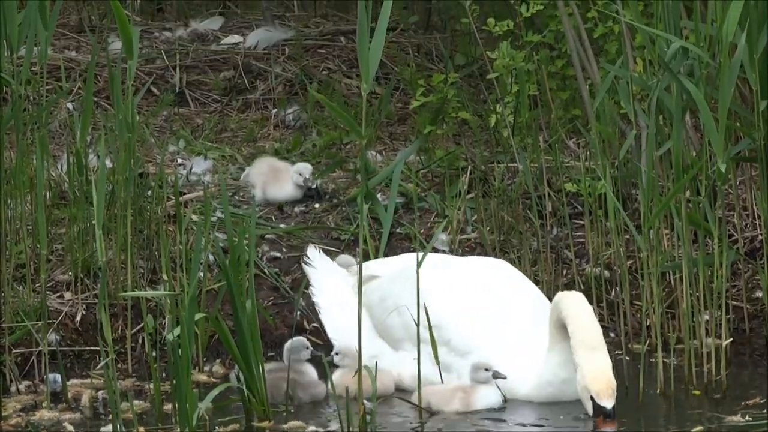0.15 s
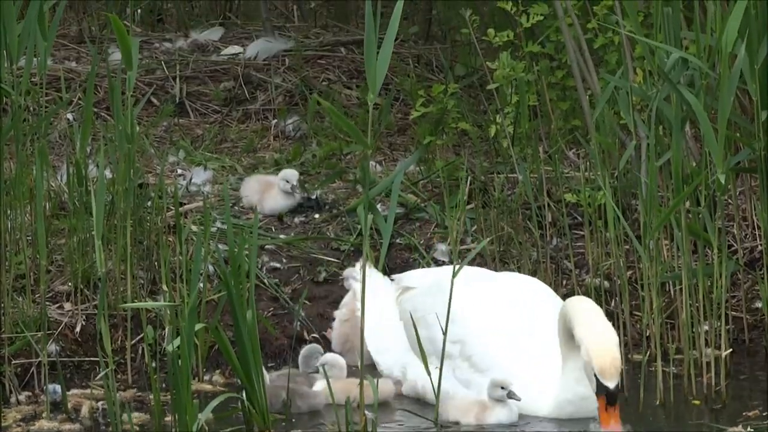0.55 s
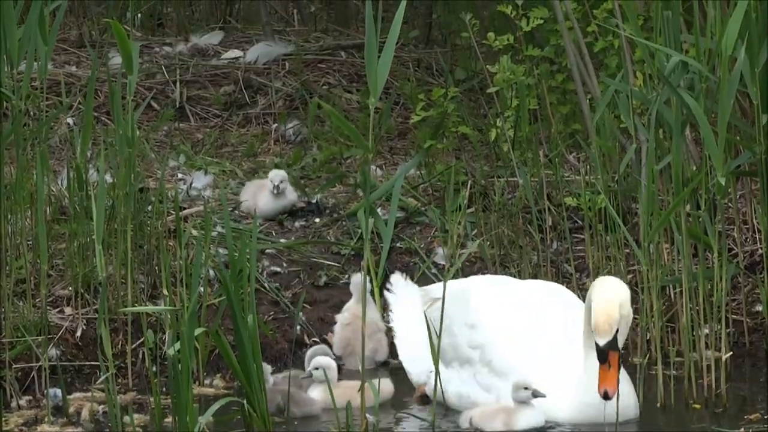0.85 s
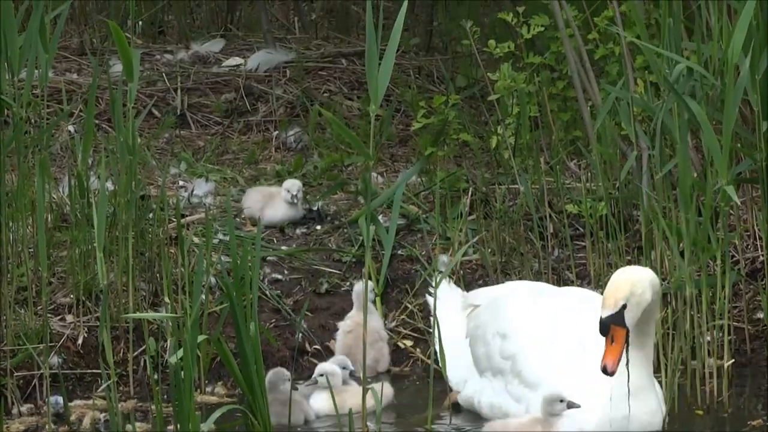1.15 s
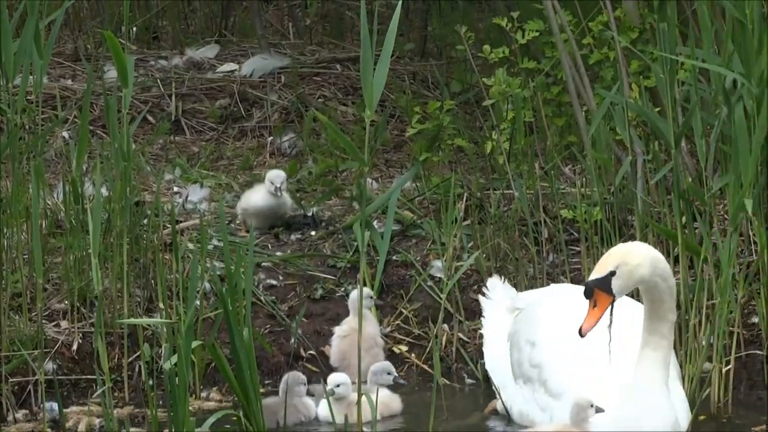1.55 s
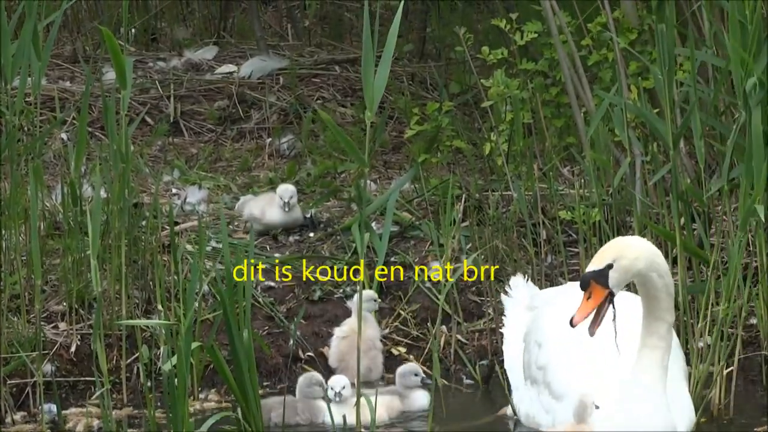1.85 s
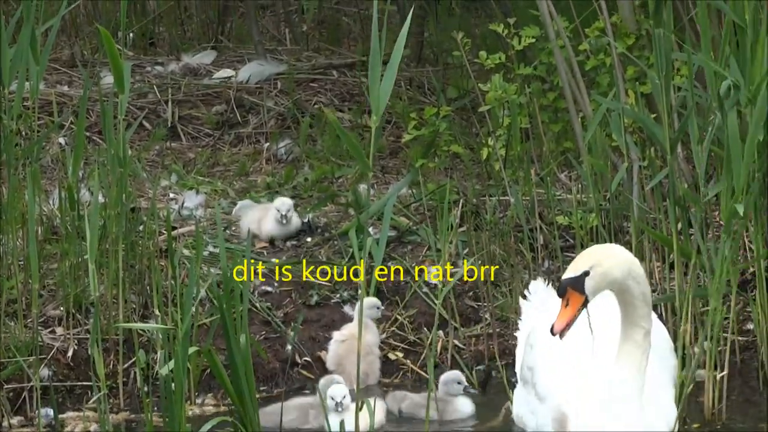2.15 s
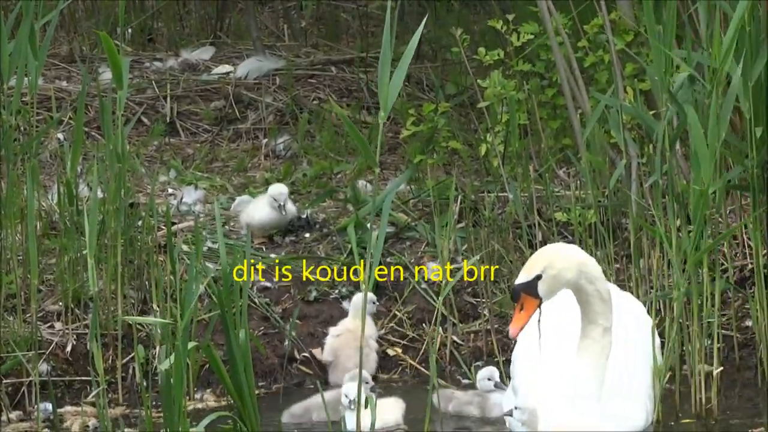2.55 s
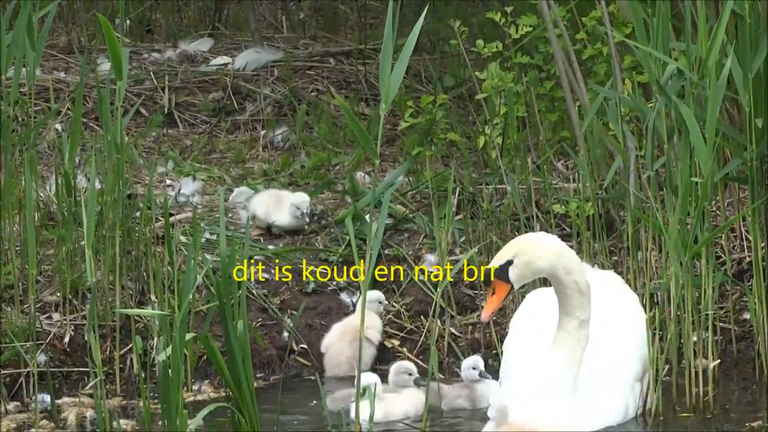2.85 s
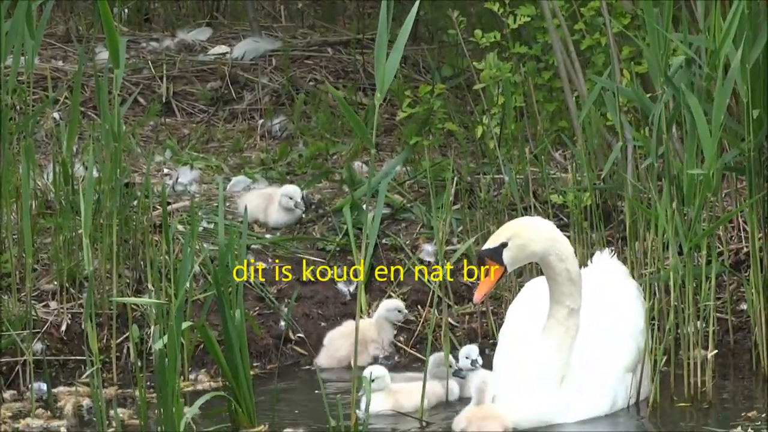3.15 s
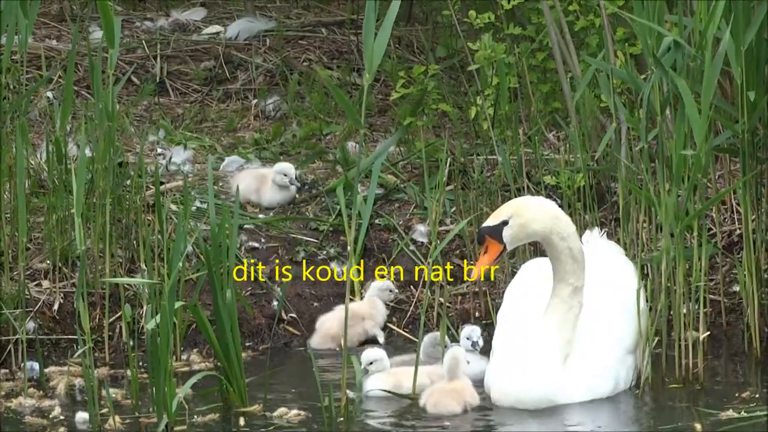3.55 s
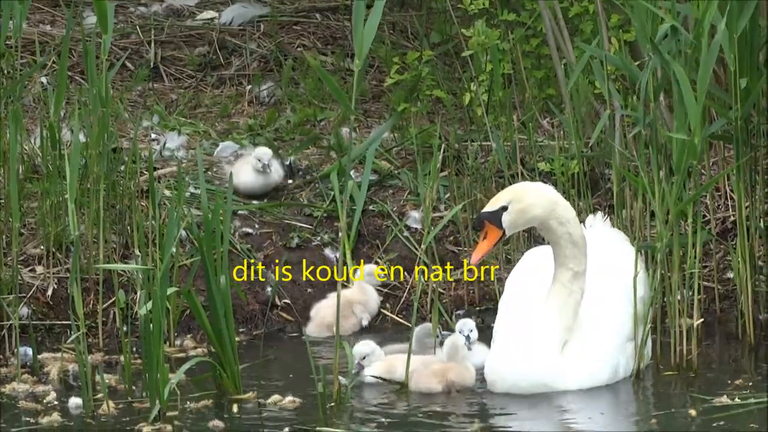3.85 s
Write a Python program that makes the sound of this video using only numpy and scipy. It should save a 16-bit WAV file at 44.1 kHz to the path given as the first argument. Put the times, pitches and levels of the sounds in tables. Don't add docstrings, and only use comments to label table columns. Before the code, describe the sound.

Swan snorting briefly three times beside a reedy bank, with thin chick peeps and gusty wind rumble.

```python
import sys
import numpy as np
from scipy import signal
from scipy.io import wavfile
from scipy.ndimage import uniform_filter1d

SR = 44100
rng = np.random.default_rng(int(sys.argv[2]) if len(sys.argv) > 2 else 0)


def put_to_file(sound):
    columns = np.atleast_2d(sound).T
    safe = np.clip(columns, -1, 1)
    whole_steps = np.round(safe * 32767)
    wavfile.write(sys.argv[1], SR, whole_steps.astype(np.int16))


def field_ratio(decibels):
    return 10 ** (np.asarray(decibels, dtype=float) / 20)


N = 175959


def read(points, hz):
    f, value = np.transpose(points)
    return np.interp(np.log(hz + 1), np.log(f + 1), value)


def evened(x):
    return x / np.sqrt(np.mean(x ** 2) + 1e-20)


def add(mix, s, sound):
    part = mix[..., max(round(s * SR), 0):][..., :sound.shape[-1]]
    part += sound[..., :part.shape[-1]]


def resonate(x, hz, *widths):
    turn = np.exp(2j * np.pi * hz * np.arange(x.shape[-1]) / SR)
    for width in widths:
        r = np.exp(-np.pi * width / SR)
        x = 2 * (turn * signal.lfilter([1 - r], [1, -r], x / turn)).real
    return x


def wander(size, span):
    drift = uniform_filter1d(rng.standard_normal(size), span)
    return evened(uniform_filter1d(drift, span))


def noise(colour, same, patchy_db, flicker_db):
    frames, hz = N // 256 + 5, np.fft.rfftfreq(1024, 1 / SR)
    a, b, c, d, patches = rng.standard_normal((frames, 513, 5)).T
    patches = uniform_filter1d(patches, size=10, axis=0)
    patches = evened(uniform_filter1d(patches, size=12, axis=1))
    like = np.clip(read(same, hz), 0, 1)[:, None]
    mid = np.sqrt(1 + like) * (a + 1j * b)
    side = np.sqrt(1 - like) * (c + 1j * d)
    z = np.array([mid + side, mid - side])
    z *= field_ratio(read(colour, hz)[:, None] + patchy_db * patches + flicker_db * wander(frames, 3))
    return evened(signal.istft(z, nperseg=1024, noverlap=768)[1][:, :N])


def scatter(dry, db):
    t60 = .17
    taps = rng.standard_normal((2, 6000)) * field_ratio(-60 * np.arange(6000) / SR / t60)
    return signal.fftconvolve(dry[None], taps * field_ratio(db) / np.linalg.norm(taps[0]), axes=1)[:, :N]


def snort(start, length, first_hz, top_hz, effort_db, bright_db, hiss_db, upper_db, rasp_db):
    # f/Hz, level/dB
    tract = [(640, -17.5), (800, 0), (1300, 0), (1550, -4), (1980, -4), (2350, -15), (2580, 0.5),
             (2720, -20),
             (3250, -17), (3800, -37), (4500, -19.5), (5500, -37), (7150, -20), (8300, -36), (10000, -45)]
    # f/Hz, width/Hz, level/dB
    nostril = [(7000, 480, 2), (8000, 1600, 9)]
    t = np.arange(0, length, 1 / SR)
    glide_share, jitter = .62, 0.0078
    climb = np.sin(np.pi / 2 * np.clip((t / length - .08) / glide_share, 0, 1)) ** 1.3
    hz = (first_hz + (top_hz - first_hz) * climb) * (1 + jitter * wander(len(t), 150))
    turns = np.cumsum(hz) / SR

    closed_db = -19
    shut_db = closed_db * (1 - climb) * (top_hz / first_hz - 1)
    voice = np.zeros(len(t))
    for k in range(1, 15):
        db = read(tract, k * hz)
        db = db + bright_db * np.clip(np.log2(k / 2), 0, 1) + upper_db * max(k - 3, 0)
        db = db + shut_db * np.clip(k - 2, 0, 2)
        db = db + 2.5 * wander(len(t), 120)
        voice += field_ratio(db) * np.cos(2 * np.pi * (k * turns + rng.random()))
    rattle = evened(resonate(rng.standard_normal(len(t)), 190, 260, 260))
    voice *= 1 + .15 * rattle
    rise_s, fall_s = .01, 0.021
    ramp = np.minimum(t / rise_s, (length - t) / fall_s)
    shape = np.sin(np.pi / 2 * np.clip(ramp, 0, 1)) ** 2

    hiss_linger_s = .035
    u = np.arange(0, length + hiss_linger_s, 1 / SR)
    air = rng.standard_normal(len(u))
    hiss = evened(sum(field_ratio(db) * resonate(air, f, w, 2 * w, 2 * w) for f, w, db in nostril))
    rasp = evened(resonate(rng.standard_normal(len(u)), 1700, 2000, 2000, 2000))
    out = (field_ratio(hiss_db) * hiss + field_ratio(rasp_db) * rasp) * np.sin(np.pi * (u / u[-1]) ** 0.87)
    swell_db = -1
    add(out, 0, np.sqrt(2) * voice * shape * field_ratio(effort_db + swell_db * (1.5 - climb)))
    return out


def swan():
    # t/s, length/s, first f/Hz, top f/Hz, effort level/dB
    calls = [
        (0.575, 0.034, 672, 675, -24.5),
        (0.595, 0.031, 676, 666, -33.5),
        (0.639, 0.028, 676, 665, -34.5),
        (0.834, .092, 382.8, 650, -25.5),
        (1.207, 0.094, 397, 601, -28),
    ]
    # slope above partial 2/(dB per octave), hiss level/dB,
    # slope above partial 3/(dB per partial), rasp level/dB
    timbres = [(-2, -52, -3, -48), (1, -53, -8, -43), (8, -53, -8, -44), (0, -41, 0, -41),
               (-8, -42, 1, -47)]
    dry = np.zeros(N)
    for call, timbre in zip(calls, timbres):
        add(dry, call[0], snort(*call, *timbre))
    t = np.arange(6000) / SR
    clap_hz, clap_db, clap_t60 = 2730, -15, 0.021
    clap = field_ratio(clap_db - 60 * t / clap_t60) * np.minimum(t / 0.0025, 1) * np.sin(2 * np.pi * clap_hz * t)
    add(dry, .922, clap)
    return dry * field_ratio([[.8], [-.8]]) + scatter(dry, -14)


def whistle(hz, level):
    turns = np.cumsum(hz) / SR
    overtone_db, overtone_hz, overtone_width = -7, 3220, 104
    overtone = field_ratio(overtone_db) / (1 + ((hz - overtone_hz) / overtone_width) ** 2)
    tone = np.sin(2 * np.pi * turns) + overtone * np.sin(4 * np.pi * turns)
    return np.sqrt(2) * tone * level * field_ratio(1.46 * wander(len(hz), 150))


def chicks():
    # t/s, f/Hz, level/dB
    peeps = [
        [(.23, 2105, -50), (.275, 2364, -44), (.3, 2833, -40), (.345, 3180, -39), (.372, 3240, -37),
         (.4, 3025, -35), (.42, 2300, -47)],
        [(.995, 2184, -49), (1.034, 2620, -43.5), (1.055, 2620, -46), (1.072, 2470, -43), (1.1, 2030, -56)],
    ]
    # t/s, length/s, first f/Hz, last f/Hz, level/dB
    chirps = [(.435, .035, 5000, 5050, -53), (2.222, .02, 4750, 4750, -52), (2.87, .03, 3700, 3950, -54),
              (.66, .036, 2030, 2020, -45), (1.01, .035, 1680, 1740, -47), (2.142, .018, 4350, 4300, -55),
              (3.565, .05, 4550, 4250, -57), (3.928, .032, 6200, 5400, -54)]
    # t/s, level/dB
    drops = [(0.384, -42), (1.439, -43), (2.179, -50), (2.351, -46), (2.422, -54), (2.526, -42.5),
             (2.988, -49), (3.137, -46.5), (3.333, -51), (3.47, -54)]
    # t/s, first f/Hz, level/dB
    lifts = [(2.14, 2200, -54), (2.29, 2600, -55), (2.935, 2400, -54), (3.055, 2250, -57),
             (3.285, 2750, -56), (3.378, 2300, -54)]
    out = np.zeros(N)
    for peep in peeps:
        s, hz, db = np.transpose(peep)
        t = np.arange(s[0], s[-1], 1 / SR)
        pitch = uniform_filter1d(np.interp(t, s, hz), size=500)
        add(out, s[0], whistle(pitch, field_ratio(np.interp(t, s, db))))
    notes = chirps + [(s, 0.0183, 3200, 2250, db) for s, db in drops]
    notes += [(s, .045, hz, 1.17 * hz, db) for s, hz, db in lifts]
    for start, length, first_hz, last_hz, db in notes:
        u = np.arange(0, 1, 1 / SR / length)
        level = field_ratio(db) * np.sin(np.pi * u) ** 0.28
        add(out, start, whistle(first_hz + (last_hz - first_hz) * u, level))
    return out * field_ratio([[-.4], [.4]]) + scatter(out, -10)


def eddy(centre, peak_db, hz, cycles, crackle_db):
    t = np.arange(-.04, .04, 1 / SR)
    halves = np.array([[.5], [-.5]])
    lead = 1.04 * halves
    tilt_db = 4 * rng.standard_normal() * halves
    swing = np.cos(2 * np.pi * hz * t + 0.35 + lead) * np.exp(-(t * hz / cycles / 0.42) ** 2)
    grit = rng.standard_normal((3, len(t)))
    grit = resonate(grit[:2] + 0.19 * grit[2], 334, 320, 1800)
    grit = signal.lfilter(*signal.butter(2, 2500, fs=SR), grit)
    crackle_s = 0.0085
    tear = evened(grit) * np.exp(-(t / crackle_s / np.sqrt(cycles)) ** 2)
    return centre - .04, field_ratio(tilt_db) * (field_ratio(peak_db) * swing + field_ratio(crackle_db) * tear)


def wind():
    # t/s, level/dB
    gust = [(0, -35), (.12, -41), (.16, -30), (.27, -34), (.5, -35), (.75, -33), (.782, -40), (.83, -33),
            (.98, -36), (1.05, -50), (1.45, -41), (1.63, -42), (1.72, -45.5), (2.3, -48), (2.55, -45),
            (2.8, -48), (3.5, -51), (3.68, -42)]
    # f/Hz, level/dB
    buffet = [(20, -4.5), (125, -1.5), (250, -9.5), (450, -20), (900, -41)]
    # f/Hz, likeness/1
    buffet_same = [(40, 1), (150, 0.9), (350, 0.11)]
    # centre t/s, peak level/dB, f/Hz, cycles/1, crackle
    # level/dB
    gust_eddies = [
        (.304, -9, 155, .8, -34),
        (.536, -15, 190, .9, -23),
        (.547, -11, 135, 1.2, -33),
        (.705, -4, 160, 1.05, -32),
                   (.152, -16, 132, 1.04, -37), (.174, -14, 165, 1.05, -35), (.191, -17.5, 115, 2, -33),
              (.211, -16.5, 129, 2.1, -27), (0.258, -18.5, 100, 0.98, -54), (.287, -38, 200, 0.55, -28),
              (.427, -10, 140, 1.8, -29), (0.46, -13.5, 165, 0.95, -25.5), (.475, -12.5, 245, 1.46, -31.5),
              (0.674, -18.5, 130, 1.9, -42), (.724, -18, 190, 1.3, -19.5), (0.746, -18.5, 167, 2.1, -28),
              (0.826, -17.5, 157, 2.7, -30.5), (.848, -11, 236, 1.7, -22.5), (.951, -25, 212, 1.1, -24.5),
              (.975, -37, 219, 0.91, -29.5), (1.439, -19, 153, 0.98, -49), (1.484, -22.5, 140, 2.7, -41.5),
              (1.729, -24.5, 102, 1.4, -70),
                   (.028, -22.5, 119, 1.3, -46), (0.051, -22.5, 138, 0.73, -40), (1.833, -19.5, 106, 3.4, -55),
             (1.887, -20, 150, 2.6, -50), (2.51, -29.5, 106, 5.3, -63), (3.64, -27, 121, 2.1, -41),
             (3.726, -20.5, 119, 1.2, -38)]
    # centre t/s, peak level/dB, f/Hz
    ripples = [(0.318, -19, 120), (0.347, -20.5, 152), (.376, -18, 112), (.389, -23, 104), (.418, -14, 202),
               (0.435, -14, 130), (0.496, -21, 163), (.526, -25, 177), (0.557, -17.5, 147),
               (.634, -20, 167), (.646, -20.5, 141), (.755, -18, 209), (.762, -20, 167), (.792, -27, 188),
               (.814, -24, 141), (.86, -21, 149), (.889, -20, 203), (0.919, -22.5, 141),
               (0.986, -21.5, 134), (1.027, -29, 124), (1.507, -23, 169), (1.643, -26.5, 132),
               (2.395, -27, 97), (2.441, -30, 107), (2.501, -30, 121), (3.619, -26, 106)]
    # centre t/s, peak level/dB, f/Hz
    pulls = [(0.332, -18, 128), (0.364, -26, 151), (.482, -25, 147), (.598, -21, 162), (.804, -17, 188),
             (.881, -17, 242), (.904, -21.5, 176), (.933, -21.5, 148), (.974, -19, 217), (1.369, -32, 131),
             (1.47, -25, 109), (1.604, -26, 190), (1.634, -22.5, 180), (1.668, -30, 127),
             (2.004, -30.5, 129), (2.053, -28.5, 138), (2.542, -26, 114), (2.602, -27.5, 185),
             (3.505, -32, 128), (3.656, -27, 155), (3.714, -30, 164), (3.944, -31, 110)]
    s, db = np.transpose(gust)
    lumps_db = 4.2 * np.tanh(wander(N, 500))
    strength_db = np.interp(np.arange(N) / SR, s, db) + lumps_db + 2.5
    out = noise(buffet + [(2500, -51), (6000, -85)], buffet_same, 5.5, 0.53) * field_ratio(strength_db)
    for row in gust_eddies:
        add(out, *eddy(*row))
    for sign, rows in ((0.96, ripples), (-1.34, pulls)):
        for centre, db, hz in rows:
            start, swing = eddy(centre, db, hz, 1.04, db - 20.5)
            add(out, start, sign * swing)
    return out


def knocks():
    # t/s, peak level/dB
    taps = [
        (.218, -25.5),
        (0.62, -17.5),
        (.458, -26),
    ]
    out, t = np.zeros((2, N)), np.arange(800) / SR
    for s, db in taps:
        grit = rng.standard_normal((3, len(t)))
        click = evened(resonate(grit[0] + 0.44 * grit[1:], 1050, 1200, 2200))
        add(out, s, field_ratio(db) * np.exp(-t / 0.0021) * click)
    return out


def ticks():
    # t/s, peak level/dB
    drips = [
        (0.244, -26.5),
        (3.073, -30),
    ]
    out, t = np.zeros(N), np.arange(400) / SR
    for s, db in drips:
        add(out, s, field_ratio(db) * np.exp(-t / 0.0022) * rng.standard_normal(len(t)))
    return resonate(out, 6350, 4000, 4000, 4000)


def car():
    # t/s, level/dB
    approach = [(2.6, -50), (3.4, -50.5), (3.7, -44), (3.99, -39.5)]
    s, db = np.transpose(approach)
    roar = rng.standard_normal((3, N))
    roar = resonate(roar[0] + 0.27 * roar[1:], 858, 280, 280)
    return evened(roar) * field_ratio(np.interp(np.arange(N) / SR, s, db) + 0.86 * wander(N, 2000))


def surroundings():
    # f/Hz, level/dB
    drone = [(20, -11.5), (100, 1.5), (173, -6), (339, -19), (527, -17), (1070, -7.5), (1530, -16.5),
             (3000, -29)]
    # f/Hz, level/dB
    high_hiss = [(1500, -0.5), (2670, -8), (3520, -10), (5120, -10), (7160, -4), (8270, -7), (11600, -29),
                 (14800, -48)]
    # f/Hz, likeness/1
    likeness = [(60, .93), (370, .74), (1000, .89), (3000, .92), (5500, .97), (7800, .988), (10300, .8),
                (11800, .999)]
    # t/s, road level/dB, hiss level/dB
    slow = [(0, -41.5, -44), (1.1, -39, -44), (2.4, -41.5, -46.5), (3.99, -40.5, -49)]
    s, road_db, high_hiss_db = np.transpose(slow)
    t = np.arange(N) / SR
    road = noise(drone + [(5000, -46.0)], likeness, 0.92, 0.55) * field_ratio(np.interp(t, s, road_db) + 5.0)
    soft_hiss = noise([(500, -35)] + high_hiss, likeness, 1.0, 0.25) * field_ratio(np.interp(t, s, high_hiss_db) + 2.0)
    return road + soft_hiss


def scene():
    return swan() + chicks() + wind() + surroundings() + ticks() + car() + knocks()


def roll_off(x):
    return signal.sosfilt(signal.butter(12, 15000, fs=SR, output="sos"), x)


def record(dry):
    heard = signal.sosfilt(signal.butter(4, 12300, fs=SR, output="sos"), dry)
    return roll_off(heard)


dry = scene()
out = record(dry)
put_to_file(out)
```